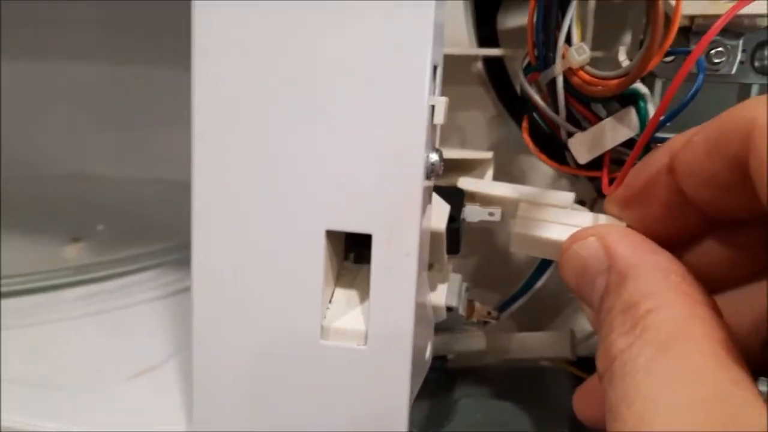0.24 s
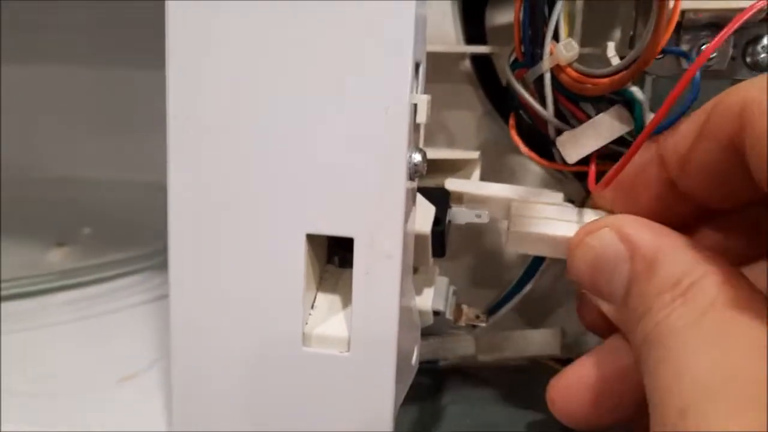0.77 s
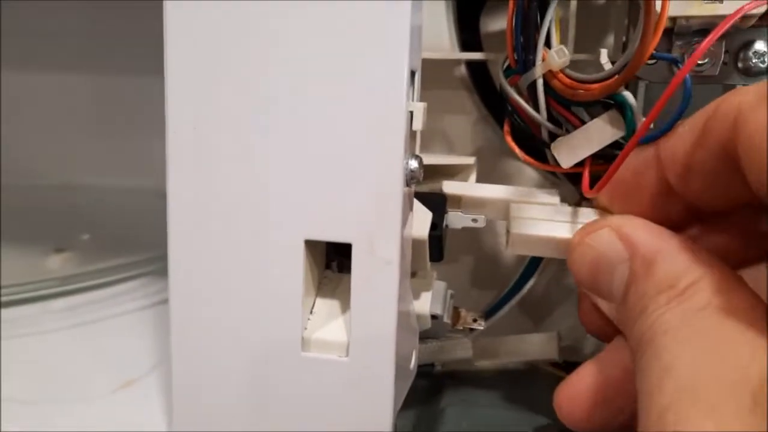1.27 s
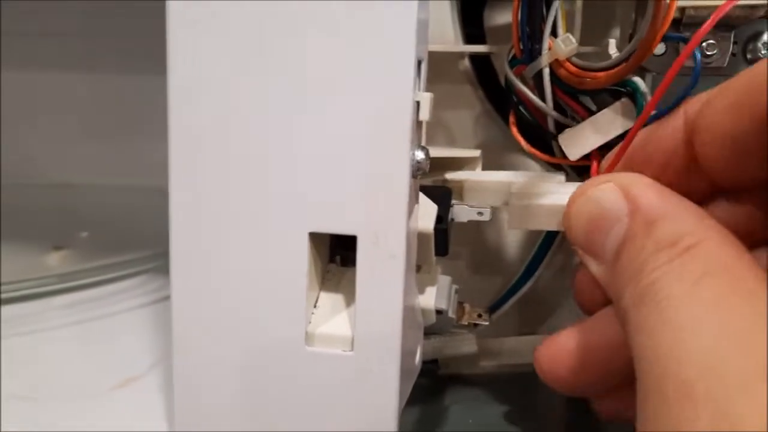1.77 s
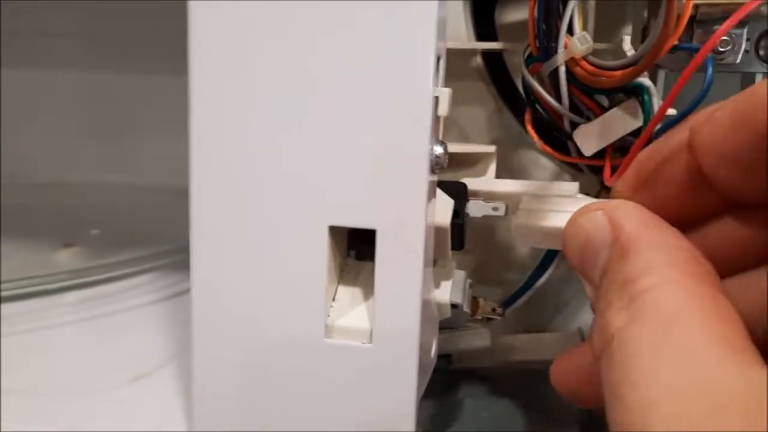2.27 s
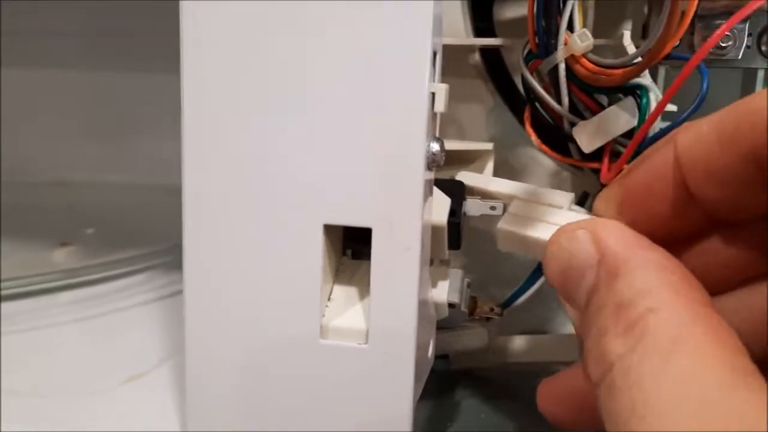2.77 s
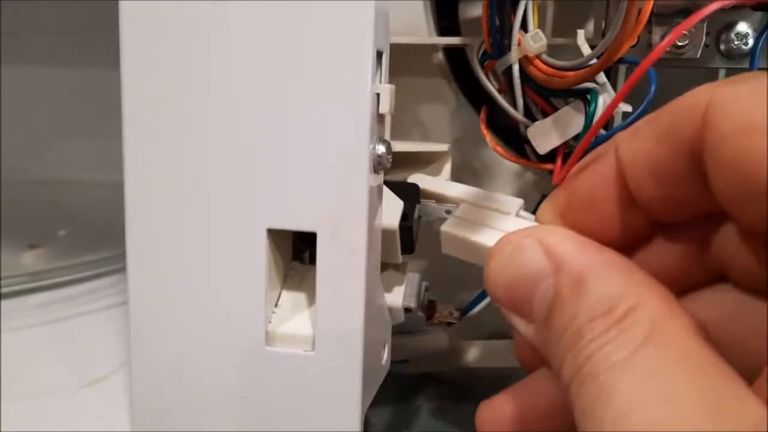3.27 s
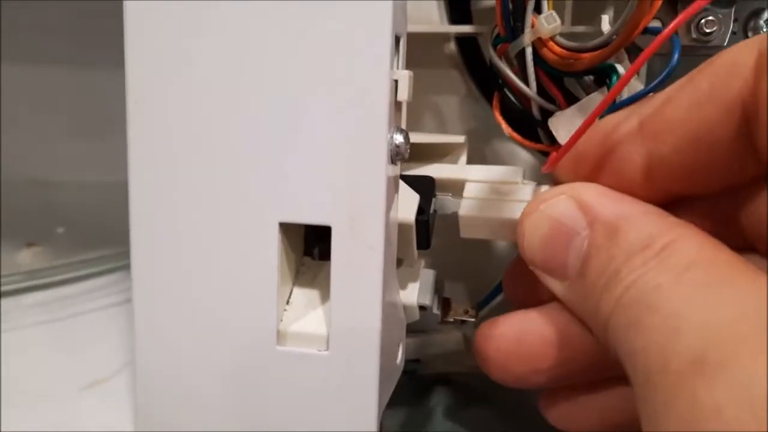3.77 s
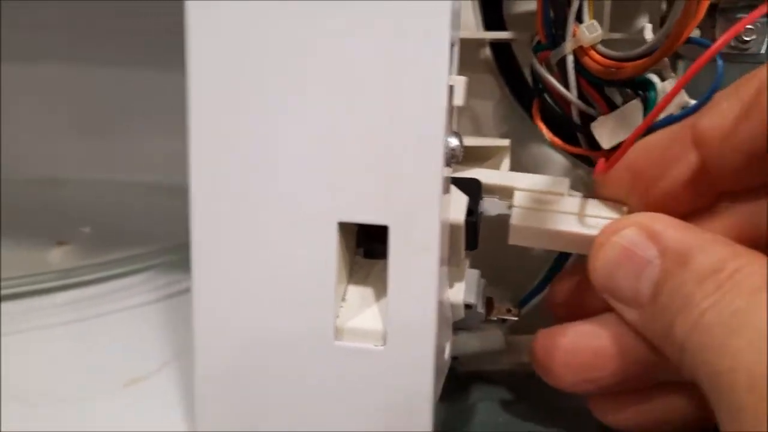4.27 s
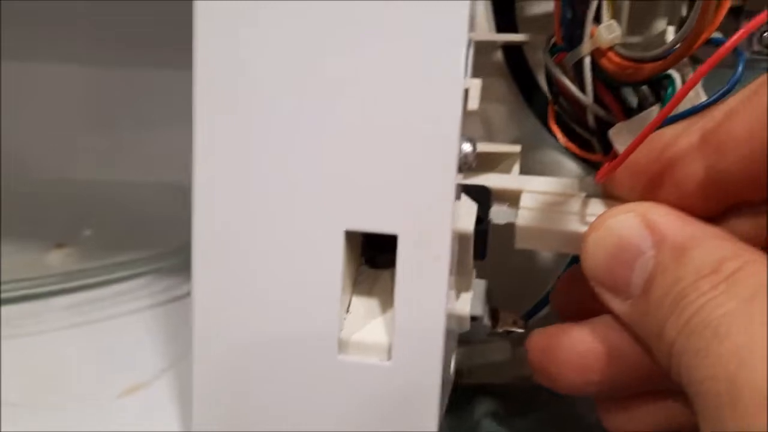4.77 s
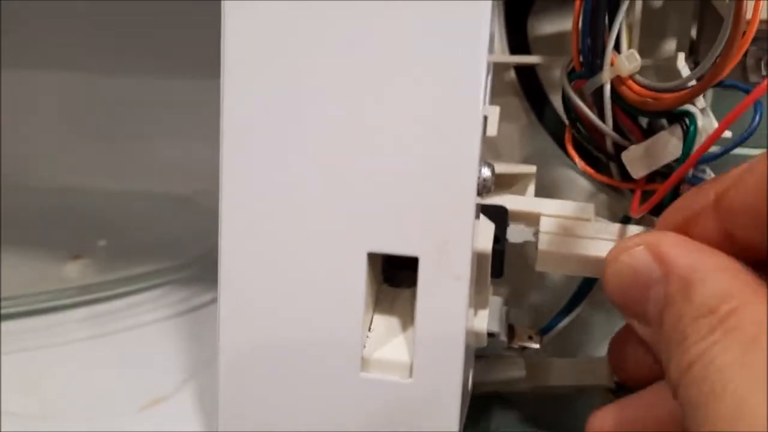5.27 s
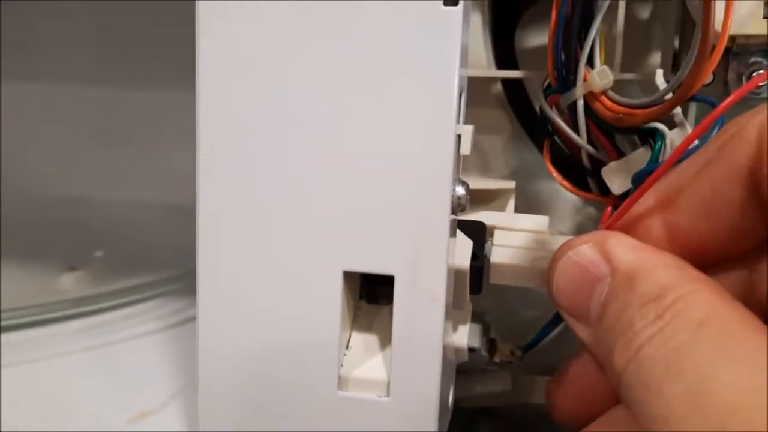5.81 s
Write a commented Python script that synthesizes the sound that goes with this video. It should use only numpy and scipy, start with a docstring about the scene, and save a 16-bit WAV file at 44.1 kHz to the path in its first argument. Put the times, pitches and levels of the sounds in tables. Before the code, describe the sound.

A low steady hum and soft, dull rush of air fill a small indoor room throughout. Close to the phone, slightly left, a plastic connector touches a switch inside a sheet-metal cabinet. At 0.1 s it skids briefly and taps twice. Faint finger rubbing passes at 0.6-0.8 s, a light tap comes at 1.0, then a soft rub, a firm, dull plastic knock at 1.3 and a lighter click at 1.45. A small tick follows at 2.2, and a low muffled rub at 2.45. Barely audible touches run from 2.95 to 3.5. At 3.8 s a loud, hollow snap, preceded by a tiny click, booms shortly in the cabinet. Faint ticks come at 4.5 and 4.8, then a small skid and quick taps around 5.0-5.1. At 5.84 s a crisp, tight double snap brings a very short, bright metallic ping, then hum.

```python
"""Mains hum and a low rush of air fill a small room; close by, a phone hears a hand work a plastic wire
connector onto the spade terminals of a switch inside an appliance cabinet. The plug skids in stick-slip steps,
taps as single contacts and snaps twice (lip, catch, seat); each contact is banded noise plus decaying modes of
housing and cabinet. Soft swells of filtered noise come and go, and the last snap rings the metal terminal, a
cluster of high modes."""
import sys
import numpy as np
from scipy import signal
from scipy.fft import irfft
from scipy.io import wavfile
from scipy.ndimage import uniform_filter1d

SR = 44100
rng = np.random.default_rng(int(sys.argv[2]) if len(sys.argv) > 2 else 0)


def to_wav(s):
    """Save 16-bit WAV."""
    ch = np.atleast_2d(s).T  # columns
    pcm = np.round(np.clip(ch, -1, 1) * 32767)  # PCM
    wavfile.write(sys.argv[1], SR, pcm.astype(np.int16))


N = 266628
RING = int(.46 * SR)  # samples that a contact rings
LEAD = int(.04 * SR)  # samples of slip ahead of a contact

# Likeness of the sound at the two microphone ports. Each row: frequency in Hz, correlation.
PORT_LIKENESS = [(60, 0.8), (200, 0.84), (400, 0.72), (700, 0.33), (1300, 0.041), (16000, 0)]


def undb(db):
    """Decibels to gain."""
    return 10 ** (np.asarray(db) / 20)


def unit(x):
    """Scale to rms 1."""
    return x / np.sqrt(np.mean(x ** 2))


def at(hz, table, axis=1):
    """Read a column of a table on a log-frequency axis."""
    table = np.array(table)
    return np.interp(np.log(np.maximum(hz, 1)), np.log(table[:, 0]), table[:, axis])


def add(out, s, sound):
    """Mix a sound in so that its lead-in ends at time s."""
    start = int(s * SR) - LEAD
    out[:, start:start + sound.shape[1]] += sound[:, :N - start]


def walk(rate):
    """Slow chance of rms 1: random levels held 1 / rate seconds and smoothed twice."""
    hold = int(SR / rate)
    steps = np.repeat(rng.standard_normal(N // hold + 1), hold)
    smooth = uniform_filter1d(uniform_filter1d(steps, hold), hold)
    return unit(smooth[:N])


def diffuse(size):
    """Frequencies and spectrum of a diffuse noise at the two ports: alike in the bass, unrelated in the treble."""
    hz = np.arange(size // 2 + 1) * SR / size
    mid, side = np.exp(2j * np.pi * rng.random((2, len(hz))))
    alike = np.clip(at(hz, PORT_LIKENESS), -1, 1)
    return hz, np.sqrt(1 + alike) * mid + np.sqrt(1 - alike) * side * np.array([[1], [-1]])


def pan(x, left_db):
    """Lean a sound to the left (to the right if negative) by a level difference between the ports."""
    return x * undb(np.array([[left_db], [-left_db]]) / 2)


def resonance(hz, centre, q):
    """Gain of one resonance, 1 at its centre."""
    return 1 / np.hypot(1, q * (hz / centre - centre / np.maximum(hz, 1)))


def ring(modes, t, detune):
    """Decaying modes; each reaches the two ports with its own phase, further apart for short waves."""
    out = 0
    for hz, db, t60 in modes:
        tune, side = rng.standard_normal(2)
        spread = np.arccos(np.clip(at(hz, PORT_LIKENESS), -1, 1))
        apart = spread * np.sign(side) * np.array([[.5], [-.5]])
        turning = 2j * np.pi * hz * (1 + detune * tune)
        wave = undb(db) * np.exp((turning - np.log(1000) / t60) * t)
        out = out + np.cos(apart) * wave.imag + np.sin(apart) * wave.real
    return out * np.sqrt(2)


def reflect(x, db, t60, delay_s, dull_hz):
    """Add a dense, fading, dulled wash of reflections that builds over delay_s, different at each port."""
    t = np.arange(RING) / SR
    hz, noise = diffuse(RING)
    dulled = irfft(noise / np.hypot(1, hz / dull_hz), RING)
    wash = unit(dulled * np.exp(-np.log(1000) * t / t60) * (1 - np.exp(-t / delay_s)))
    return x + undb(db) * signal.fftconvolve(x, wash / np.sqrt(RING), axes=1)[:, :x.shape[1]]


def room():
    """A mains hum that wavers in level and phase under a soft rush of air, slow noise with a fixed spectrum."""
    # Mains lines. Each row: frequency in Hz, mean level in dB.
    hum_lines = [(59.7, -58.5), (119.5, -53)]
    # Colour of the air in the room. Each row: frequency in Hz, relative level in dB per Hz.
    air_colour = [(25, -38), (55, -7.5), (85, -9.5), (120, -9.5), (200, -13), (300, -3), (500, -15),
                  (800, -22.5), (1400, -26.5), (1850, -36.5), (2500, -28.5), (3400, -42.5), (8000, -43),
                  (16000, -50.5)]
    air_db, swell_db, waver_db = -50.5, -0.18, -2.7
    hz, noise = diffuse(N)
    air = unit(irfft(noise * undb(at(hz, air_colour)), N)) * undb(air_db + swell_db * walk(2.95))
    t = np.arange(N) / SR
    hum = 0
    for line_hz, db in hum_lines:
        level = np.sqrt(2) * undb(db + waver_db * walk(4.595))
        hum = hum + level * np.sin(2 * np.pi * line_hz * t + 0.61 * walk(1.77))
    return pan(air + hum, left_db=-0.13)


def clack(t, weight_db, knock_db, edge_db, pitch_hz, slip_s):
    """Half-octave bands: a gritty slip swells into a short crack, then the cavity rings on, its bass building late."""
    # Dense ring of plastic and cavity. Each row: frequency in Hz, relative level in dB per half octave,
    # time to fall 60 dB in seconds.
    cavity = [(60.4, -19.5, 0.76), (120, -10.5, 0.54), (250, -5.5, 0.65), (493, -3.5, 0.19),
              (1030, -8.5, 0.17), (1520, -14, 0.18), (2060, -10, 0.23), (2960, -13, 0.17), (4050, -8, 0.18),
              (7900, -10, 0.11), (15000, -13.5, 0.17)]
    crack_db, crack_s = 4, 0.0036
    tail_db, build_cycles = -4, 0.62
    hz, noise = diffuse(len(t))
    after = np.maximum(t, 0)
    grit = unit(uniform_filter1d(undb(5.4 * rng.standard_normal(len(t))), size=12))
    crack = grit * np.exp(np.where(t < 0, np.minimum(t, 0) / slip_s, -after / crack_s))
    # each point of contact favours its own narrow resonances, one above all
    uneven_db = 4.0 * unit(uniform_filter1d(rng.standard_normal(len(hz)), size=25))
    noise = noise * undb(uneven_db)
    body = np.hypot(1, undb(8) * resonance(hz, pitch_hz, q=5.8))
    # bass follows the push, treble the sharpness of the edge
    colour = [(250, weight_db), (600, knock_db), (1500, 0), (2300, 0), (6000, edge_db), (15000, 2.0 * edge_db)]
    out = 0
    for centre in 60 * np.sqrt(2) ** np.arange(17):
        distance = np.minimum(np.abs(2 * np.log2(np.maximum(hz, 1) / centre)), 1)  # in half octaves
        share = noise * np.cos(np.pi / 2 * distance)
        band = irfft(share * body, len(t)) * len(t) / np.linalg.norm(share)
        build = 1 - np.exp(-after * centre / build_cycles)
        tail = build * np.exp(-np.log(1000) * after / at(centre, cavity, axis=2))
        radiated = centre ** 2 / (centre ** 2 + 900 ** 2)  # the small plug itself gives off little bass
        swell = np.hypot(undb(crack_db) * radiated * crack, undb(tail_db) * tail)
        out = out + band * undb(at(centre, cavity) + at(centre, colour)) * swell
    return out


def contact(db, weight_db, edge_db, pitch_hz=None, slip_s=None):
    """One contact clacks and rings the housing; a moment later its weight booms the cabinet."""
    # Sheet-metal cabinet. Each row: frequency in Hz, relative level in dB, time to fall 60 dB in seconds.
    cabinet = [(84, -15, 0.35), (106.94, -6, 0.81), (171.3, -5.5, 0.52), (193, -5.5, 0.26),
               (247, -6.5, 0.11), (262.7, -5.5, .39), (332, -7, 0.25), (393.4, -10, 0.19)]
    # Switch housing and its bracket. Each row: frequency in Hz, relative level in dB,
    # time to fall 60 dB in seconds.
    housing = [(488, -14.5, 0.19), (557, -14, 0.17), (588, -15, 0.3), (722.5, -4, 0.21), (893, -12, 0.14),
               (982, -11, 0.16), (1040, -14, 0.17), (1362, -14, 0.22), (1414, -2.5, 0.13),
               (1499, 0.5, 0.097), (2240, -3, 0.094), (2647, -8, 0.14), (2810, -16, 0.14), (3010, -19, .1)]
    cabinet_db, cabinet_lag_s, cabinet_build_s = -2, 0.0031, 0.0072
    housing_db, housing_build_s = -2, 0.0005
    t = np.arange(-LEAD, RING) / SR
    after = np.maximum(t, 0)
    later = np.maximum(t - cabinet_lag_s, 0)
    firmness_db = db + 43.5  # above a typical contact
    # a firmer contact slips for a shorter time before it catches: half as long per 20 dB
    slip_s = slip_s or 0.0019 * .5 ** (firmness_db / 20)
    # heavy, gentle contacts knock the housing most
    knock_db = -0.5 + 0.36 * weight_db - 0.1 * firmness_db
    # sharper contacts ring the plastic higher, by .04 octave per dB of edge
    pitch_hz = pitch_hz or 2385 * 2 ** (.04 * edge_db)
    boom = undb(cabinet_db + weight_db) * ring(cabinet, later, detune=0.0059)
    boom = boom * (1 - np.exp(-later / cabinet_build_s))
    knock = undb(housing_db + knock_db) * ring(housing, after, detune=0.0067)
    knock = knock * (1 - np.exp(-after / housing_build_s))
    return undb(db) * (clack(t, weight_db, knock_db, edge_db, pitch_hz, slip_s) + boom + knock)


def skids():
    """The plug skids along a blade: stick-slip steps that grow as the hand presses."""
    # Each row: start in seconds, length in seconds, level at the end in dB.
    skid_rows = [(0.097, 0.022, -54.5), (2.107, .03, -65), (4.98, .04, -62)]
    step_s, swell_db_per_s = .012, 108
    out = np.zeros((2, N))
    for s, length, end_db in skid_rows:
        for step in np.arange(0, length, step_s):
            late = step_s * rng.uniform(-.15, 0.155)
            db = end_db - swell_db_per_s * (length - step)
            add(out, s + step + late, contact(db, weight_db=-10, edge_db=0.5, slip_s=step_s / 2))
    return out


def taps():
    """The plug taps the switch, each time a single contact."""
    # Each row: time in seconds, level in dB, weight of the push in dB, treble edge in dB.
    tap_rows = [(0.119, -47, -7, -3), (0.168, -57.5, -11, 2), (1.030, -47, 3.5, 0.5),
                (1.307, -30, -11.5, -18.5), (1.318, -43, 4, -6), (1.4445, -38, -14, -3.5),
                (2.171, -46.5, -13, -2), (2.955, -59.5, -5, -7), (3.106, -62, -3, 2), (3.213, -58, 18, -2),
                (3.443, -52, 3, 0.5), (3.468, -54.5, 5, -6), (4.535, -66, -7, 2), (4.766, -61.5, 8, -10),
                (5.024, -54, -1, -1.5), (5.111, -52.5, -8, -2), (5.126, -50.5, 0.5, -3)]
    out = np.zeros((2, N))
    for s, db, weight_db, edge_db in tap_rows:
        add(out, s, contact(db, weight_db, edge_db))
    return out


def swells():
    """Soft, uneven swells of filtered noise, each around one resonance."""
    # Each row: time of the peak in seconds, time from the peak to 1/e in seconds, level in dB, centre in Hz.
    swell_rows = [(0.643, .05, -70, 1490), (0.806, 0.06, -63, 1680), (1.235, 0.1, -57, 750),
                  (1.238, 0.055, -65.5, 1880), (2.451, 0.03, -46.5, 294)]
    t = np.arange(N) / SR
    hz, noise = diffuse(N)
    out = 0
    for s, length, db, centre_hz in swell_rows:
        shaped = unit(irfft(noise * resonance(hz, centre_hz, q=1.8) ** 2, N))
        out = out + shaped * undb(db) * np.exp(-((t - s) / length) ** 2)
    return out * undb(1.3 * walk(120))


def snaps():
    """The socket snaps over a blade: its lip clicks just ahead, the plastic catches, then it seats."""
    # Each row: time of the catch in seconds, level in dB, pitch of the plastic in Hz,
    # level of the lip's click in dB, time until it seats in seconds, level of the seating in dB.
    snap_rows = [(3.795, -23.5, 940, -29.5, .018, -50), (5.8352, -28, 1490, -39.5, .0034, -27)]
    lip_lead_s = .0043
    sprung_slip_s = 0.00038  # lip and seat are driven by the socket's spring and hardly slip
    out = np.zeros((2, N))
    for s, db, pitch_hz, lip_db, seat_s, seat_db in snap_rows:
        lip = contact(lip_db, weight_db=-9.5, edge_db=3, slip_s=sprung_slip_s)
        catch = contact(db, weight_db=3.5, edge_db=-9, pitch_hz=pitch_hz)
        seat = contact(seat_db, weight_db=1.5, edge_db=-4.5, pitch_hz=2960, slip_s=sprung_slip_s)
        add(out, s - lip_lead_s, lip)
        add(out, s, catch)
        add(out, s + seat_s, seat)
    return out


def terminal():
    """The socket's spring snaps onto the blade: a short metal ping that lingers between the cabinet walls."""
    # Metal spade terminal. Each row: frequency in Hz, relative level in dB, time to fall 60 dB in seconds.
    blade = [(5500, 2, 0.004), (8600, -7.5, 0.025), (11540, -7, 0.013), (11590, -5, 0.04),
             (12280, -1, 0.017), (13500, -9, .009), (14400, 2, 0.011)]
    ping_s, ping_db, attack_s = 5.8395, -16, 0.00053
    out = np.zeros((2, N))
    t = np.arange(-LEAD, RING) / SR
    ping = ring(blade, np.maximum(t, 0), detune=0.0011) * np.clip(t / attack_s, 0, 1)
    add(out, ping_s, undb(ping_db) * ping)
    return reflect(out, db=-7.5, t60=0.12, delay_s=0.00091, dull_hz=15000)


def scene():
    """The plug at work, a little to the left, in the humming room, whose walls answer faintly."""
    work = pan(skids() + taps() + snaps() + terminal(), left_db=2.0)
    return room() + reflect(work, db=-21.5, t60=0.4, delay_s=0.0088, dull_hz=6000) + swells()


def record(dry):
    """The phone cuts the top: a steep low-pass at 15.9 kHz."""
    return signal.sosfilt(signal.ellip(10, .2, 70, 15900, fs=SR, output="sos"), dry)


dry = scene()
out = record(dry)
to_wav(out)
```